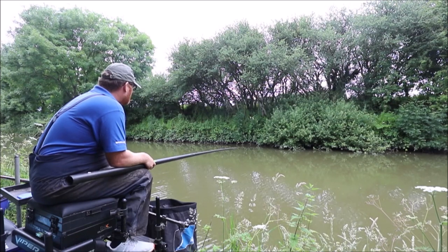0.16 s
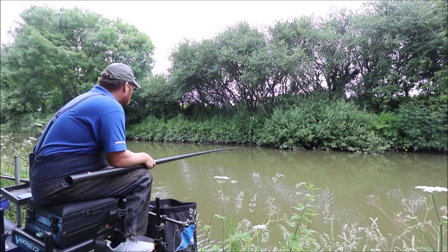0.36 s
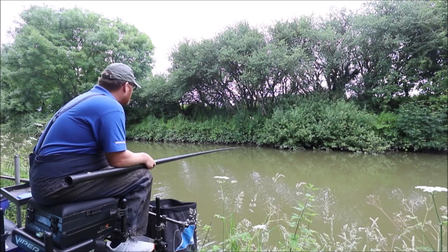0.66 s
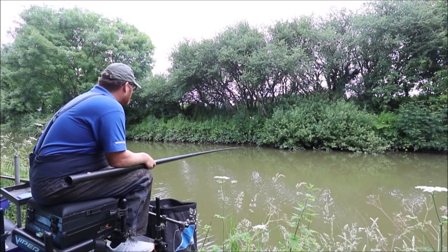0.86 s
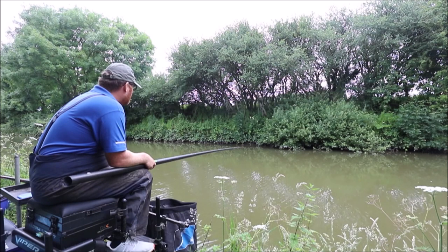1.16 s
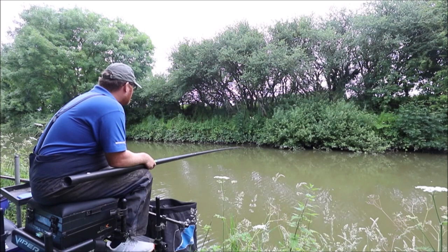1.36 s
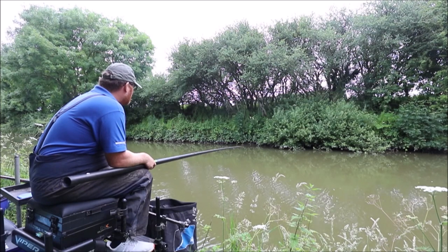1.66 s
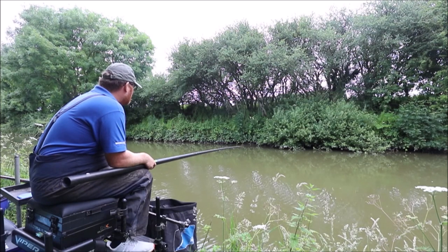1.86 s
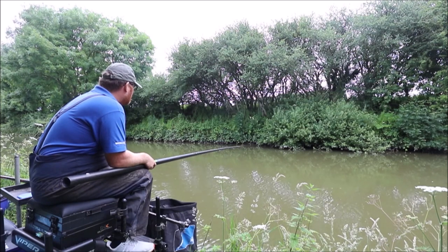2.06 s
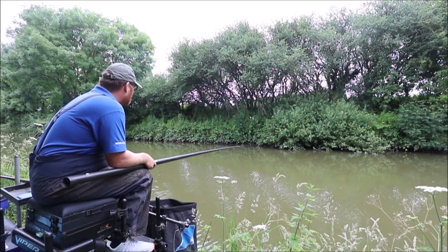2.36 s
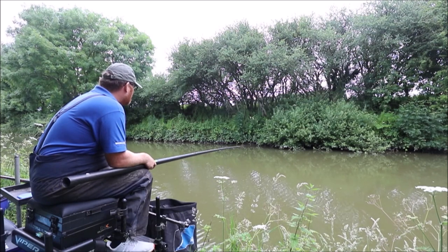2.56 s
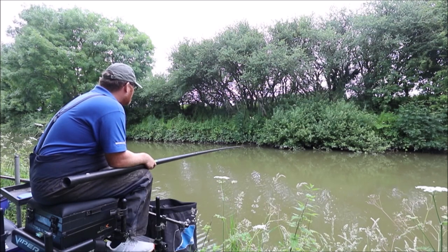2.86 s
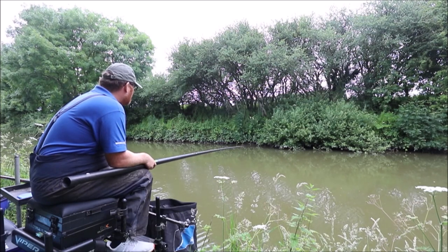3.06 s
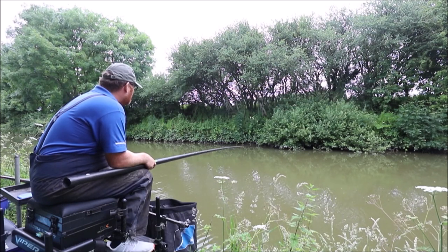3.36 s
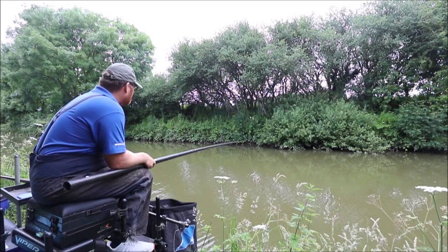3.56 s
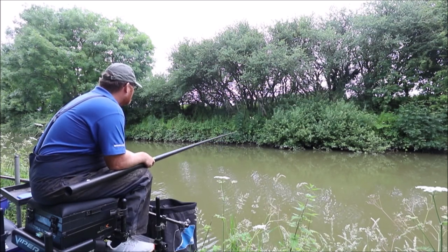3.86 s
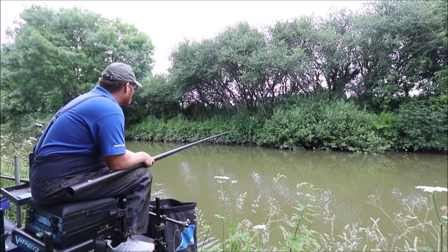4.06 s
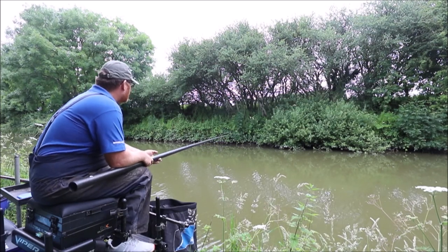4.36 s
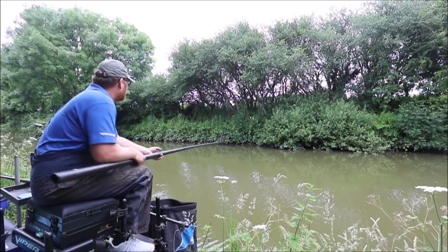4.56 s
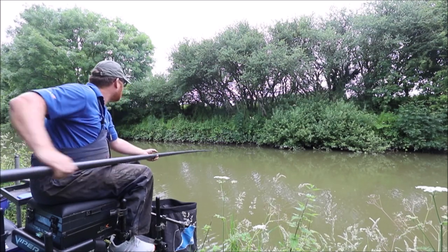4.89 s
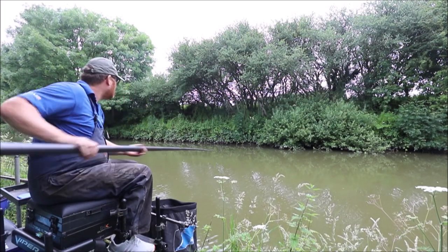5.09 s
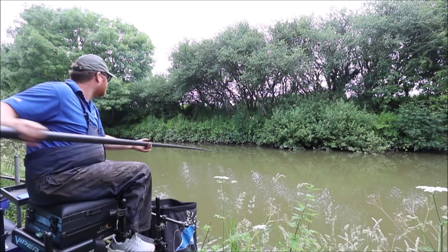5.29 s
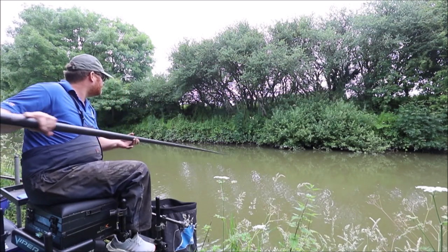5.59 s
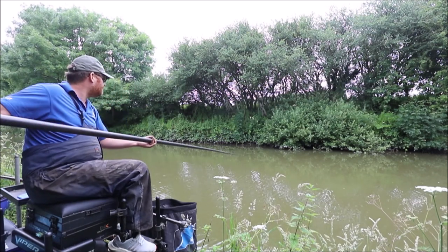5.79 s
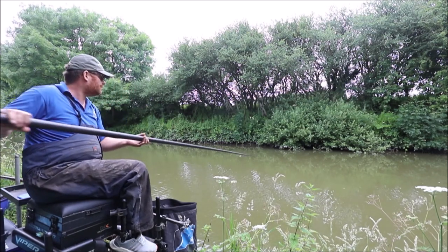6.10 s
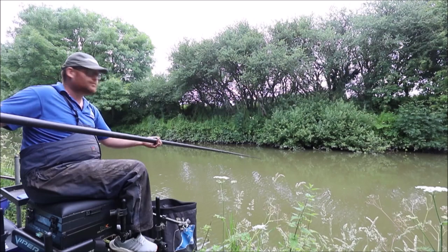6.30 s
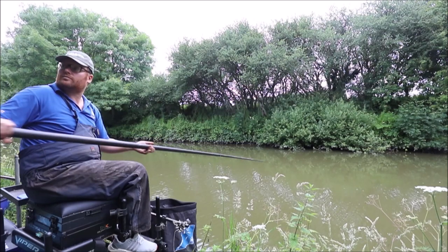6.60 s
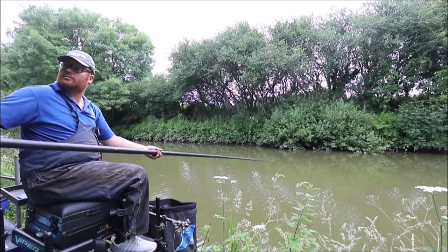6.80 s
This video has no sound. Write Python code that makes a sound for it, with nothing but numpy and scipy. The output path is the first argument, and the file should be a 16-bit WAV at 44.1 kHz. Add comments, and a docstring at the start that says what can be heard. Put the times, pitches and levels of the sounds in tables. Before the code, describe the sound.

Throughout, a very soft rush of open air, like distant traffic and leaves, lies under a barely audible drone that recedes. From 0 to 0.9 s a small songbird, probably a wren, throws out quick, piercing, gliding whistles at changing pitches. From 0.94 to 1.6 s comes a rapid even trill of about ten falling chips, then until 2.25 s more high whistles, some sweeping downward. A tiny dense tick at 2.5 s and a rising whistle at 2.67 s lead to four flick-and-swoop calls between 2.76 and 3.5 s. Echoes from water, bushes and trees trail off. After a lull, around 4.5 s a hollow pole begins sliding through hands: small squeaks at 4.7 s, a loud hissing zip near 5.1 s, another at 5.55 s, then gentler grainy rubbing strokes, faintly squeaky, until the end near 6.9 s.

```python
"""A small songbird, probably a wren, sings one phrase: gliding near-pure tones, with echoes off water, bushes, trees.
Then an angler slides a long hollow pole back through his hands, stroke by stroke: shaped noise makes rub and hiss,
harmonic tones following the sliding speed make the zip of its fine ribs, short broken tones make the squeaks.
Under both lie a faint rush of open air (coloured noise) and a receding drone (weak tones). Mono in two channels."""
import sys
import numpy as np
from scipy import signal
from scipy.fft import rfft, irfft, next_fast_len
from scipy.io import wavfile
from scipy.ndimage import uniform_filter1d, map_coordinates

SR = 44100
rng = np.random.default_rng(int(sys.argv[2]) if len(sys.argv) > 2 else 0)


def store_pcm(level_fs):
    """Save levels as 16-bit WAV."""
    pcm = np.round(np.clip(level_fs, -1, 1) * 32767).astype(np.int16)
    wavfile.write(sys.argv[1], SR, np.atleast_2d(pcm).T)


N = 306054

# All table levels are relative: gains, wobbles and shapes add to them.
# Open-air noise spectrum: f/Hz, density/dB
AIR_SPECTRUM = [(15, -40), (30, -11), (55, -8), (76, -1.5), (130, -4.5), (161, -1), (255, -2.5), (392, 0),
                (486, -1.5), (812, -1.5), (955, -4), (1250, -4.5), (3780, -11), (4690, -14), (7030, -13),
                (15800, -30.5)]
# Open-air loudness: t/s, level/dB
AIR_LEVEL = [(0, -50), (1.7, -50), (3.2, -48), (4.4, -47.5)]
# Far-off drone, nominal tones: f/Hz, level/dB
DRONE_TONES = [(113.0, -67.5), (721.4, -65)]
# Receding of the drone: t/s, gain/dB
DRONE_GAIN = [(0, 1), (4.5, -3), (6.94, -8.5)]

# Hand strokes along the pole: fastest t/s, speeding up/s, slowing down/s, rub/dB, hiss/dB
STROKES = [(4.568, 0.271, 0.061, -46.5, -48), (4.7, 0.2036, 0.125, -39, -35.5),
           (4.864, 0.0957, 0.126, -35.5, -30.5), (5.1, 0.0706, 0.128, -29.5, -20),
           (5.3, 0.0765, 0.206, -39, -30.5), (5.555, 0.1333, 0.0865, -29, -24.5),
           (5.791, 0.153, 0.103, -38, -28.5), (6.014, 0.1424, 0.0927, -32.5, -30.5),
           (6.233, 0.1024, 0.0905, -34, -29), (6.527, 0.1776, 0.0667, -34, -32),
           (6.718, 0.1276, 0.1076, -36.5, -30.5), (6.912, 0.096, 0.116, -31, -27)]
RUB_DIP_DB, HISS_DIP_DB = 10, 14  # lost at the ends of a stroke
STROKE_FLATNESS = 2.61  # exponent; higher holds the level longer
# Rub noise spectrum: f/Hz, density/dB
RUB_SPECTRUM = [(290, -52), (500, -14.5), (989, -21.5), (1160, -15), (1350, -10), (2190, -1), (3300, 0),
                (4150, -5.5), (4640, -5), (5500, -6), (7150, -36.5), (12100, -120)]
# Hiss noise spectrum: f/Hz, density/dB
HISS_SPECTRUM = [(2350, -31.5), (4000, -5), (5150, -10), (6120, -1.5), (8440, -3), (9360, -5), (12600, -5),
                 (15800, -8)]
# Modes of the hollow pole: f/Hz, width/Hz, level/dB
TUBE_MODES = [(907, 19.5, -4.5), (1160, 23.6, 1), (1598, 101, -4), (2223, 142, -0.5), (3990, 900, -5)]
# Skin sticking and slipping on slower strokes, except the 4.78 s tone, which rides an octave above the first
# rib zip: t/s, length/s, start f/Hz, end f/Hz, level/dB
SQUEAKS = [(4.675, 0.0339, 1902, 1492, -31.5), (4.7, 0.033, 1596, 1909, -30.5),
           (4.78, 0.045, 3600, 3820, -43.5), (5.72, .07, 1510, 1561, -45),
           (6.248, 0.084, 911.6, 894, -46.5), (6.49, .07, 906.7, 897, -53), (6.66, 0.1, 1138, 1157, -43.5),
           (6.82, 0.09, 1240, 1310, -46.5)]
# Hand over the ribs, nominal rates:
# fastest t/s, speeding up/s, slowing down/s, start f/Hz, top f/Hz, end f/Hz, level/dB
ZIPS = [(4.88, .11, .06, 1740, 2060, 1760, -43), (5.137, .096, .066, 1750, 4324, 1590, -26),
        (5.312, 0.068, .085, 1650, 2261, 1510, -41), (5.562, .092, .045, 1600, 3018, 2697, -31)]
ZIP_DIP_DB = 6  # lost at the ends of a zip

# Opening and linking whistles, nominal pitches: t/s, length/s, start f/Hz, bend f/Hz, end f/Hz,
# bend after/s, level/dB, loudest after/s, swell/dB
WHISTLES = [(0.0, 0.0376, 4710, 5090, 5262, 0.032, -22.5, 0.00176, 32),
            (0.082, 0.063, 4010, 3831, 3082, 0.0085, -28.5, 0.0241, 30.5),
            (0.188, 0.0269, 4836, 4531, 4195, 0.0081, -29.5, 0.0107, 14.5),
            (0.292, 0.0496, 5778, 6599, 6329, 0.027, -22.5, 0.0108, 0.5),
            (0.385, 0.115, 3665, 3776, 3851, 0.0496, -32.5, 0.0385, 20),
            (0.532, 0.2174, 8180, 7363, 7187, 0.0173, -21.5, 0.034, 13),
            (0.791, 0.0966, 5686, 5307, 5418, 0.016, -22.5, 0.058, 7),
            (1.627, 0.0491, 6270, 7716, 6670, 0.0094, -17, 0.0418, 13),
            (1.71, 0.0303, 4944, 4629, 4192, 0.00404, -21, 0.0093, 15.5),
            (1.795, 0.058, 6720, 5274, 6590, 0.013, -18, 0.038, 13.5),
            (1.844, 0.113, 6610, 6681, 6637, 0.03, -23, 0.0242, 14.5),
            (1.962, 0.117, 5848, 3603, 3351, 0.075, -21, 0.0246, 17),
            (2.142, 0.11, 5900, 6680, 6626, 0.017, -18, 0.0294, 9.5),
            (2.673, 0.054, 6366, 7926, 6980, 0.0233, -22.5, 0.053, 6.5)]
# Syllable shapes, nominal pitches: t from onset/s, f/Hz, level/dB
GRACE_SHAPE = [(-.011, 5320, -17), (-.005, 4915, -5.5)]
CHIP_SHAPE = [(-.001, 5350, -6), (.002, 5200, 0), (.007, 5080, -1), (.011, 4600, -3), (.015, 4250, -4),
              (.021, 4060, -10)]
TICK_SHAPE = [(-.0022, 7000, -7), (.0013, 5800, 0), (.0034, 4750, -1), (.0046, 4550, -6)]
FLICK_SHAPE = [(0, 4589, -15), (.008, 5310, -5), (.014, 5850, 3.5), (.018, 5725, -11)]
SWOOP_SHAPE = [(0, 7503, -10.5), (.02, 7707, -9), (.045, 7968, -13), (.07, 7733, -10.5), (.088, 6786, -3),
               (.1, 5836, 0.5), (.112, 4750, -2), (.122, 4414, -6), (.13, 4424, -28)]
# Flick and swoop onsets: t/s, level/dB
FLICK_ONSETS = [(2.761, -23), (2.946, -23), (3.145, -23), (3.341, -23.5)]
SWOOP_ONSETS = [(2.784, -18), (2.979, -18), (3.176, -19), (3.38, -21)]
# Evenly spaced or coincident syllables: first t/s, last t/s, level/dB, crescendo/dB
CHIP_RUN = (.9412, 1.5707, -15, 0.5)
TICK_PAIR = (0.1, .2628, -46.5, 9.5)
TICK_STACK = (2.5, 2.5, -32.5, 1.5)
CHIP_SAG = 0.0263  # pitch share lost at the end of the last chip
STACK_LEAD_S, STACK_ACCENT_DB = 0.0014, 1.43  # every second tick: earlier, stronger
STACK_FIRST_DB = -5.5  # on the first tick

TOP_HZ = 15850  # band limit


def amp(db):
    """Decibels to gain."""
    return 10 ** (np.asarray(db) / 20)


def unit(x):
    """Scale to rms 1."""
    return x / np.sqrt(np.mean(x ** 2) + 1e-20)


def curve(points):
    """(s, value) points interpolated to one value per sample."""
    t_s, value = np.transpose(points)
    return np.interp(np.arange(N) / SR, t_s, value)


def wobble(rate_hz, size=N):
    """Smooth random curve through rate_hz random knots per second."""
    knots = rng.standard_normal(int(size * rate_hz / SR) + 4)
    return map_coordinates(knots, [np.arange(size) * rate_hz / SR])


def filtered(x, response):
    """Multiply the spectrum of x by a response of frequency in Hz."""
    size = next_fast_len(N + SR // 2)
    return irfft(rfft(x, size) * response(np.fft.rfftfreq(size, 1 / SR)), size)[:N]


def noise(spectrum):
    """Noise of rms 1 coloured by (Hz, dB) points, interpolated over log frequency."""
    f_hz, db = np.transpose(spectrum)

    def colour(hz):
        return amp(np.interp(np.log(hz + 1), np.log(f_hz), db))

    return unit(filtered(rng.standard_normal(N), colour))


def add(track, t_s, sound):
    """Mix a sound into the track from t_s."""
    start = max(0, round(t_s * SR))
    track[start:start + len(sound)] += sound[:N - start]


def glide(contour, waver, waver_hz, edge_s):
    """Phase and envelope of a wavering tone along (s, Hz, dB) points, faded at both ends."""
    t_s, hz, db = np.transpose(contour)
    t = np.arange(t_s[0], t_s[-1] + edge_s / 2, 1 / SR)
    pitch_hz = np.interp(t, t_s, hz) * (1 + waver * wobble(waver_hz, len(t)))
    to_end_s = np.minimum(t - t[0], t[-1] - t)
    fade = np.sin(np.pi / 2 * np.clip(to_end_s / edge_s, 0, 1)) ** 2
    return 2 * np.pi * np.cumsum(pitch_hz) / SR, amp(np.interp(t, t_s, db)) * fade


def open_air(gain_db=1.0):
    """Distant traffic and leaves: a soft, slightly restless rush of coloured noise."""
    level_db = curve(AIR_LEVEL) + gain_db + 0.484 * wobble(5.113)
    return amp(level_db) * noise(AIR_SPECTRUM)


def drone(waver=0.0038, swell_db=3.0):
    """Weak tones, unsteady in pitch and level, perhaps of distant machinery."""
    gain_db = curve(DRONE_GAIN)
    out = np.zeros(N)
    for hz, db in DRONE_TONES:
        pitch_hz = hz * (1 + waver * wobble(12))
        tone = np.sqrt(2) * np.sin(2 * np.pi * np.cumsum(pitch_hz) / SR)
        out += amp(db + gain_db + swell_db * wobble(2.973)) * tone
    return out


def slowing(t, fastest_s, rise_s, fall_s):
    """0 at the fastest moment of a stroke, 1 at its two ends."""
    return np.maximum((fastest_s - t) / rise_s, (t - fastest_s) / fall_s)


def stroke_levels():
    """Gains of rub and hiss, swelling and fading with each stroke; overlapping strokes add in power."""
    t, rub_power, hiss_power = np.arange(N) / SR, np.zeros(N), np.zeros(N)
    for *timing, rub_db, hiss_db in STROKES:
        slack = slowing(t, *timing)
        near = slack < 2
        dip = slack[near] ** STROKE_FLATNESS
        rub_power[near] += amp(rub_db - RUB_DIP_DB * dip) ** 2
        hiss_power[near] += amp(hiss_db - HISS_DIP_DB * dip) ** 2
    return np.sqrt(rub_power), np.sqrt(hiss_power)


def patches(x, depth_db, life_s):
    """Narrow resonances come and go, each lasting about life_s."""
    z = signal.stft(x, nperseg=1024)[2]
    frames = max(2, round(life_s * SR / 512))
    field = uniform_filter1d(rng.standard_normal(z.shape), size=2, axis=0)
    field = uniform_filter1d(field, frames, axis=1)
    return unit(signal.istft(z * amp(depth_db * unit(field)), nperseg=1024)[1][:N])


def tube_response(f):
    """Sum of the hollow pole's resonances, in alternating sign."""
    total = 0
    for k, (centre_hz, width_hz, db) in enumerate(TUBE_MODES):
        damping = 1j * f * width_hz
        total = total + (-1) ** k * amp(db) * damping / (centre_hz ** 2 - f ** 2 + damping)
    return total


def pole_friction(rub_db=-2, hiss_db=0.9, tube_db=-9.0):
    """Skin and cloth catch and slip on the hollow pole: grainy noise with shifting resonances."""
    rub_gain, hiss_gain = stroke_levels()
    grain = unit(amp(1.3 * wobble(500) + 1.1 * wobble(90)))
    ring = unit(filtered(rng.standard_normal(N), tube_response))
    body = patches(noise(RUB_SPECTRUM), depth_db=5.5, life_s=0.07)
    fizz = patches(noise(HISS_SPECTRUM), depth_db=3, life_s=0.05)
    rub = rub_gain * (amp(rub_db) * body + amp(tube_db) * ring)
    hiss = hiss_gain * amp(hiss_db) * fizz
    return grain * (rub + hiss)


def pole_squeaks(waver=0.024, broken_db=4):
    """Short, wavering tones of broken level: mostly skin sticking and slipping, one riding above a rib zip."""
    out = np.zeros(N)
    for t_s, length_s, start_hz, end_hz, db in SQUEAKS:
        contour = [(t_s, start_hz, db), (t_s + length_s, end_hz, db)]
        phase, level = glide(contour, waver, waver_hz=476, edge_s=0.00395)
        broken = unit(amp(broken_db * wobble(153, len(phase))))
        add(out, t_s, level * broken * np.sin(phase))
    return out


def pole_ribs(gain_db=2.0, uneven_db=-10):
    """Ribs sound a rough tone, pitch following sliding speed; unequal ribs add a line between harmonics."""
    out = np.zeros(N)
    for fastest_s, rise_s, fall_s, start_hz, top_hz, end_hz, db in ZIPS:
        t = np.linspace(fastest_s - rise_s, fastest_s + fall_s, 100)
        slack = slowing(t, fastest_s, rise_s, fall_s) ** 2
        hz = top_hz + (np.where(t < fastest_s, start_hz, end_hz) - top_hz) * slack
        contour = np.transpose([t, hz, db - ZIP_DIP_DB * slack])
        phase, level = glide(contour, waver=0.025, waver_hz=900, edge_s=0.006)
        tone = np.sin(phase) + amp(-1) * np.sin(2 * phase) + amp(-11) * np.sin(3 * phase)
        tone += amp(uneven_db) * np.sin(3 * phase / 2)
        grip = unit(amp(3.6 * wobble(200, len(phase))))
        add(out, t[0], amp(gain_db) * level * grip * tone)
    return out


def note(contour, edge_s, second_db=-38, third_db=-45, waver=0.00542):
    """Syrinx tone, almost pure: the octave strengthens on high notes, lower ones add a weak third harmonic."""
    phase, level = glide(contour, waver, waver_hz=170, edge_s=edge_s)
    hz = np.gradient(phase) * SR / (2 * np.pi)
    octave = amp(second_db + np.interp(hz, [6500, 7600], [-2, 4])) * np.sin(2 * phase)
    third = (hz < SR / 6) * amp(third_db) * np.sin(3 * phase)  # kept below Nyquist
    return level * (np.sin(phase) + octave + third)


def whistle(length_s, start_hz, bend_hz, end_hz, bend_s, db, loudest_s, swell_db):
    """(s, Hz, dB) contour that eases into its bend and drifts on, swelling and fading once."""
    t = np.linspace(0, length_s, 100)
    slide = np.sin(np.pi / 2 * np.interp(t, [0, bend_s], [0, 1]))
    drift = np.sin(np.pi / 2 * np.interp(t, [min(bend_s, length_s), length_s], [0, 1])) ** 2
    hz = start_hz + (bend_hz - start_hz) * slide + (end_hz - bend_hz) * drift
    off_peak = np.interp(t, [0, min(loudest_s, length_s), length_s], [1, 0, 1])
    return np.transpose([t, hz, db - swell_db * off_peak ** 2])


def beats(run, count):
    """(s, dB) of syllables at equal steps under a steady crescendo."""
    first_s, last_s, db, crescendo_db = run
    return np.linspace([first_s, db], [last_s, db + crescendo_db], count)


def tick_stack():
    """(s, dB) of fourteen ticks piled on two instants, every second one earlier and stronger."""
    ticks = beats(TICK_STACK, count=14)
    ticks[1::2] += [-STACK_LEAD_S, STACK_ACCENT_DB]
    ticks[0, 1] += STACK_FIRST_DB
    return ticks


def trill(shape, onsets, gain_db, edge_s, sag=0):
    """One syllable repeated at slightly varying pitch; sag lowers its end as the run goes on."""
    out = np.zeros(N)
    for progress, (t_s, db) in zip(np.linspace(0, 1, len(onsets)), onsets):
        sung = np.array(shape) * [1, 1 + 0.00764 * rng.standard_normal(), 1]
        sung[:, 1] *= 1 - sag * progress * np.linspace(0, 1, len(sung))
        add(out, t_s + shape[0][0], amp(db + gain_db) * note(sung, edge_s))
    return out


def bird():
    """Syrinx tones: whistles, a trill of chips, brief ticks and four flick-and-swoop pairs."""
    song = np.zeros(N)
    for t_s, *shape in WHISTLES:
        add(song, t_s, amp(0.5) * note(whistle(*shape), edge_s=0.00223))
    chips = beats(CHIP_RUN, count=10)
    song += trill(GRACE_SHAPE, chips, gain_db=-1, edge_s=0.0027)  # soft grace note leads each chip
    song += trill(CHIP_SHAPE, chips, gain_db=-4, edge_s=0.0049, sag=CHIP_SAG)
    ticks = [*beats(TICK_PAIR, count=2), *tick_stack()]
    song += trill(TICK_SHAPE, ticks, gain_db=1.5, edge_s=0.00097)
    song += trill(FLICK_SHAPE, FLICK_ONSETS, gain_db=0.33, edge_s=0.00182)
    song += trill(SWOOP_SHAPE, SWOOP_ONSETS, gain_db=0.05, edge_s=0.0031)
    return song


def scatter(t60_s, build_s):
    """Random echo tail of unit energy: quick build-up, then 60 dB decay per t60_s."""
    t = np.arange(SR * 3 // 4) / SR
    tail = rng.standard_normal(len(t)) * amp(-60 * t / t60_s) * (1 - np.exp(-t / build_s))
    return unit(tail) / np.sqrt(len(t))


def banks(x, water_delay_s=0.00333, near_db=-5, near_t60_s=0.1925, far_db=-12, far_t60_s=0.59,
          build_s=0.0091):
    """Direct sound, a bounce off the water, and ever-changing scatter from near bushes and far trees."""
    out = x.copy()
    add(out, water_delay_s, amp(-6) * x)
    step = SR // 8
    padded = np.pad(x, (step, 2 * step))
    echoes = np.zeros(N + 4 * step + SR * 3 // 4)
    for start in range(0, N + step, step):  # leaves stir: new paths for each overlapping piece
        piece = padded[start:start + 2 * step]
        if piece.any():
            near = amp(near_db) * scatter(near_t60_s, build_s)
            far = amp(far_db) * scatter(far_t60_s, build_s)
            wet = signal.fftconvolve(piece * signal.windows.cosine(len(piece)), near + far)
            echoes[start:start + len(wet)] += wet
    return out + echoes[step:step + N]


def scene():
    """Air, drone, pole and echoing bird, alike in both channels."""
    background = open_air() + drone()
    pole = pole_friction() + pole_squeaks() + pole_ribs()
    mono = background + pole + banks(bird())
    return np.array([mono, mono])


def record(dry):
    """Remove everything from TOP_HZ up."""
    return np.array([filtered(channel, lambda hz: hz < TOP_HZ) for channel in dry])


dry = scene()
out = record(dry)
store_pcm(out)
```